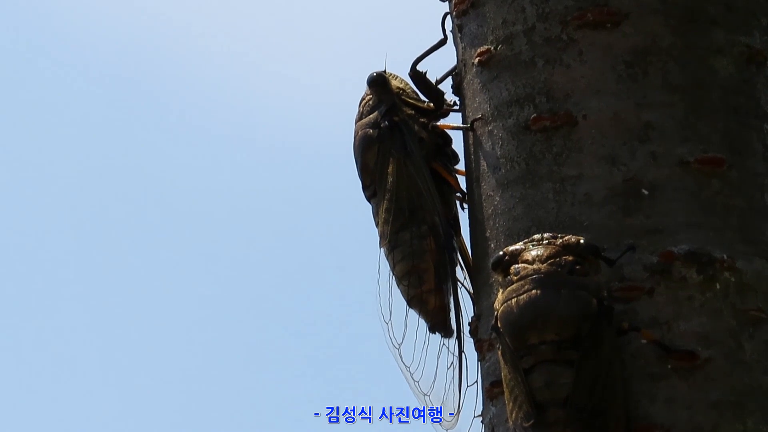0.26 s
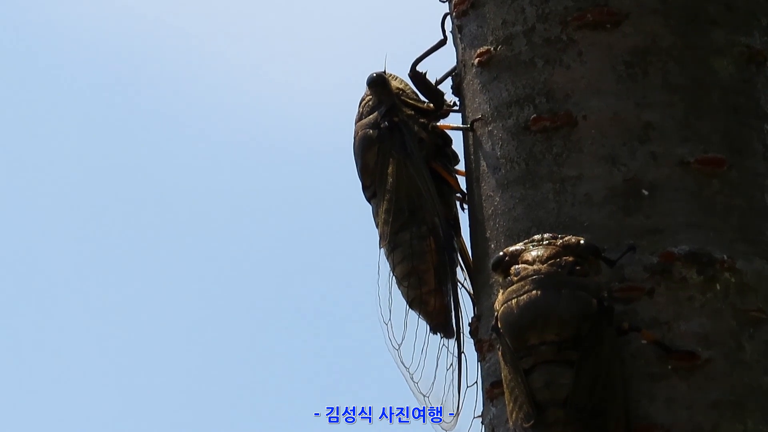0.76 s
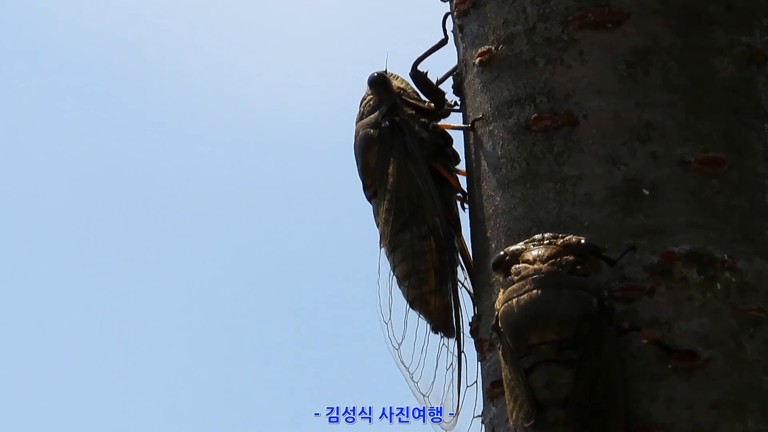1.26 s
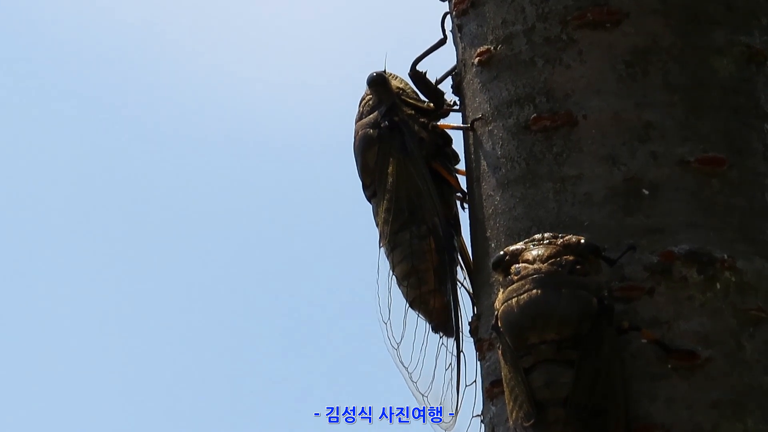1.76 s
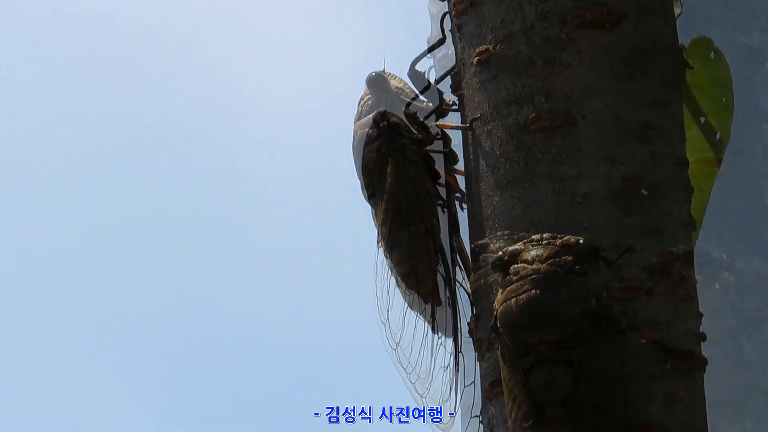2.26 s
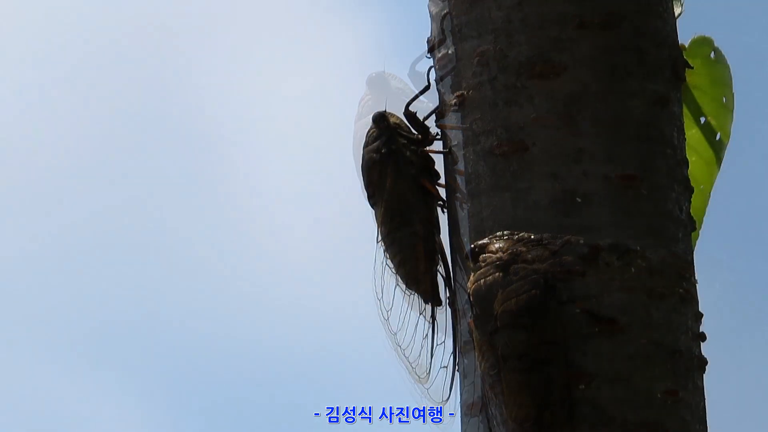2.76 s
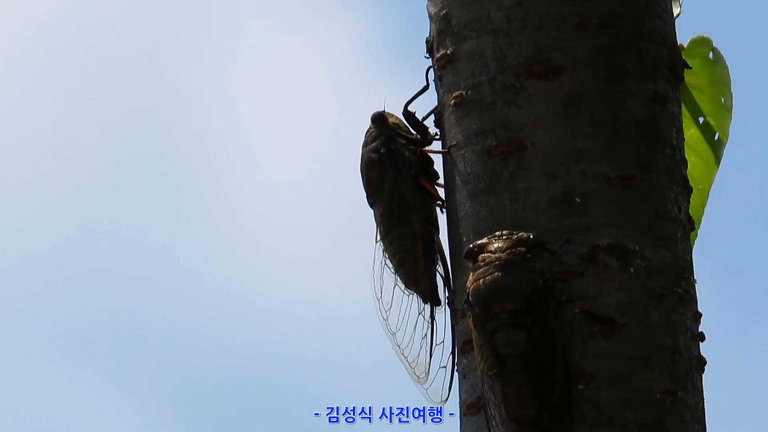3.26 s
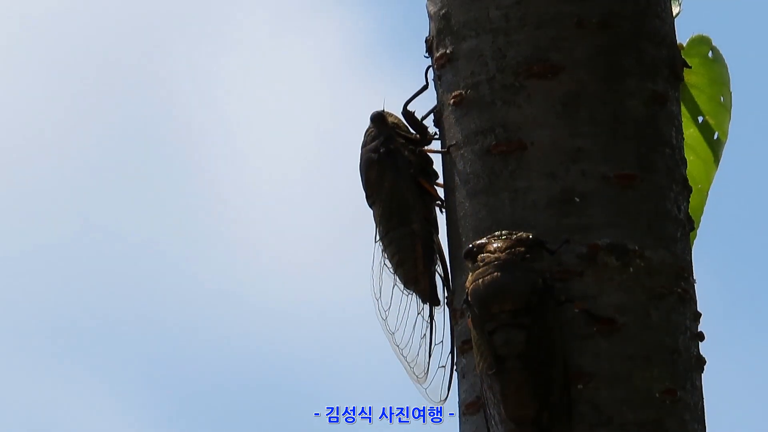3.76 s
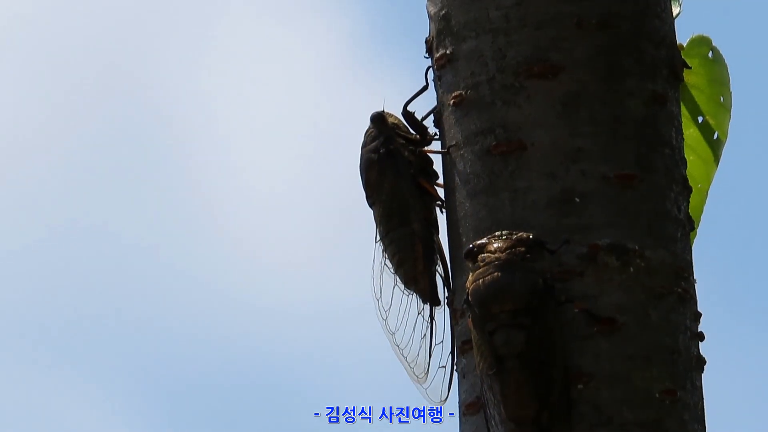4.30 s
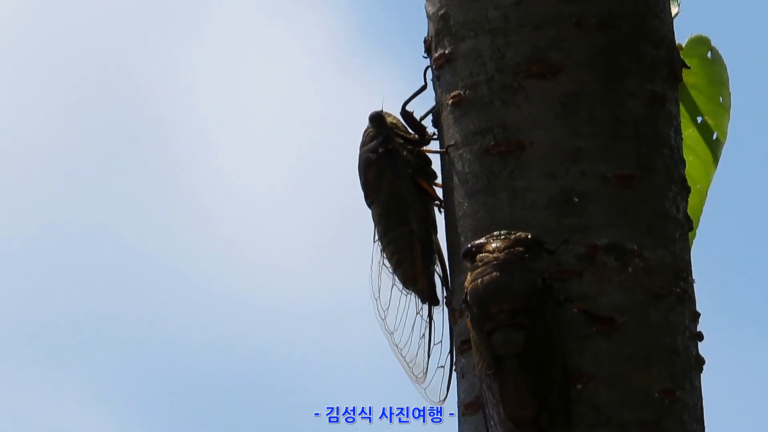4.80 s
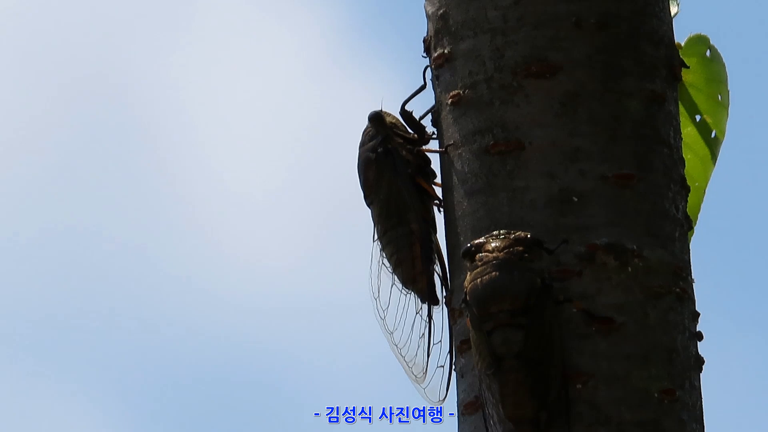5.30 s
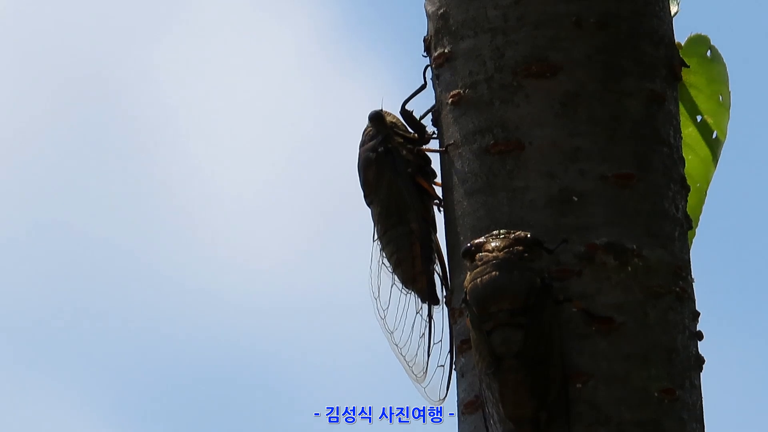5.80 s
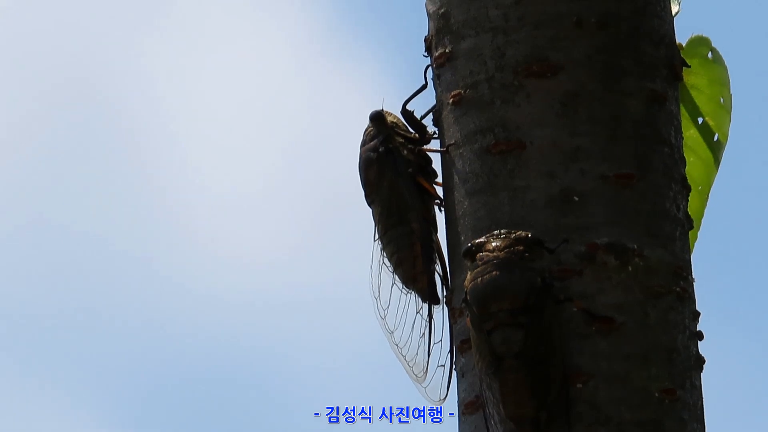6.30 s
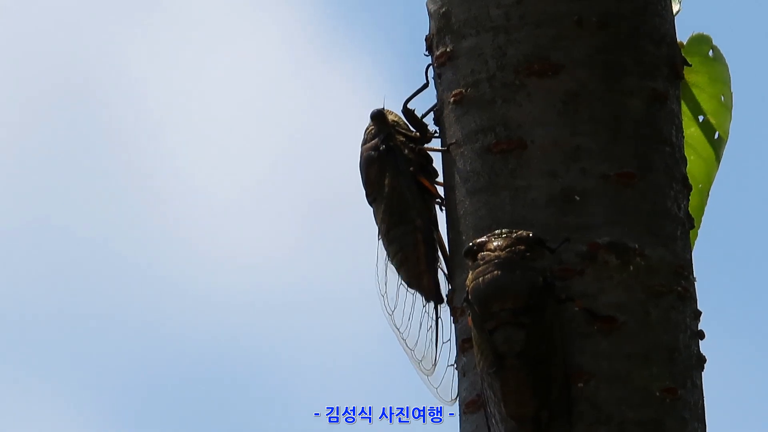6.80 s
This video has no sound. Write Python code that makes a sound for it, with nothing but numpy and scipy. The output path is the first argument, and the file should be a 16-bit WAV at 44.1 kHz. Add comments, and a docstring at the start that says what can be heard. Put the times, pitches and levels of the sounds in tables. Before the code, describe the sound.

From the start, a nearby cicada buzzes loudly on a tree trunk, a high, hissing, ringing rattle with a very fast pulse. It weakens slightly, falters and stops short at about 1.2 seconds. Behind it, a faint hiss of far cicadas and a low rumble of distant traffic continue throughout, briefly heard alone. From about 2 seconds another cicada swells up slowly, its tone opening a little between 3.3 and 3.9 seconds and peaking just after 4. Soft, brief rustles pass at around 3, 3.3, 4 and 5.2 seconds, mostly covered by the buzz. At 4 seconds a neighbouring cicada joins with a slightly slower pulse and a broader sizzle, taking the lead by about 5 seconds. Both keep buzzing loudly until the end at about 7 seconds. The space is open air among trees, with very little echo.

```python
"""A cicada buzzes on a trunk over a far chorus and town rumble. Each muscle stroke buckles the ribs of
its tymbals in a row of clicks that ring in the hollow belly. It tires, falters and stops short at 1.2 s.
From 2 s another swells up slowly and lifts its belly half open; a few soft rustles pass from 3 s.
At 4 s a neighbour joins with slower strokes and takes the lead."""
import sys
import numpy as np
from scipy import signal
from scipy.fft import rfft, irfft, next_fast_len
from scipy.io import wavfile
from scipy.ndimage import uniform_filter1d

SR = 44100
rng = np.random.default_rng(int(sys.argv[2]) if len(sys.argv) > 2 else 0)


def dump(signal):
    """Clip the signal to [-1, 1] and save it as 16-bit WAV at the path in sys.argv[1]."""
    limited = np.clip(np.atleast_2d(signal).T, -1, 1)
    pcm = np.round(limited * 32767).astype(np.int16)
    wavfile.write(sys.argv[1], SR, pcm)


N = 310905

# ending singer, direct click spectrum: f/Hz, gain/dB
ENDING_SPECTRUM = [(1060, -64), (1800, -27.5), (2930, -15.5), (3320, -6.5), (3630, -7.5), (3870, 1),
                   (4800, -3), (5160, -4.5), (6760, 1.5), (8460, -9.5), (11000, -9.5), (12700, -29),
                   (15500, -17)]
# ending singer, belly modes: f/Hz, width/Hz, gain/dB
ENDING_BELLY = [(3410, 25, -3), (3550, 50, -1), (3840, 46, 9), (3985, 41, 4), (4310, 74, -2), (4680, 44, 5),
                (4835, 41, 5), (5370, 42, 2), (5740, 86, 1), (5990, 47, 11), (6080, 40, 6.5), (6262, 25, 7),
                (6590, 110, 9), (6850, 47, 8), (7230, 65, 5), (7590, 27, -9), (7870, 65, -1), (8720, 28, 1),
                (8450, 51, -12), (9090, 88, -4), (10200, 150, -14), (10940, 43, 0), (10500, 43, -8),
                (11400, 47, -9), (11400, 42, -14), (11700, 170, -23)]
# far chorus, direct spectrum: f/Hz, gain/dB
CHORUS_SPECTRUM = [(1470, -23), (2500, -6.5), (3020, -8.5), (3530, 3.5), (4200, -2), (4710, 3),
                   (7480, -4.5), (8150, -9), (9980, -14), (12600, -26), (14000, -32)]
# far chorus, belly modes: f/Hz, width/Hz, gain/dB
CHORUS_BELLY = [(4670, 120, -2), (5970, 55, -1.5), (6900, 106, -6), (7400, 100, -13), (7900, 69, -6),
                (8470, 47, -8)]
# traffic spectrum: f/Hz, gain/dB
RUMBLE_SPECTRUM = [(12, -39), (20, -12), (38, -9), (59, 2), (82, -3.5), (235, -11.5), (277, -15),
                   (306, -14.5), (416, -19), (1020, -22.5), (2600, -41), (3380, -76), (5720, -120)]
# traffic envelope: t/s, level/dB, hum boost/dB, whirr boost/dB
TOWN_LEVELS = [(0.0, -36, -4.5, 1.5), (2.1, -37.5, -2.5, 2.1), (2.6, -39.5, 0.5, -1),
               (3.1, -35.5, 0.3, -1.1), (5.7, -39.5, -0.4, -2), (7.05, -41.5, -3, -8)]
# swelling singer, envelope: t/s, level/dB
SWELLING_LEVELS = [(1.95, -58), (2.25, -39), (2.5, -31), (2.97, -23.5), (4.3, -18.5), (4.9, -19),
                   (5.4, -23), (7.05, -22.5)]
# swelling singer, direct click spectrum: f/Hz, gain/dB
SWELLING_SPECTRUM = [(1060, -69), (1800, -32), (2770, -20.5), (3150, -12), (4670, -2), (5300, -13.5),
                     (6070, -2.5), (8090, -14.5), (10600, -16), (11700, -29), (12700, -39), (15500, -23)]
# swelling singer, closed belly modes: f/Hz, width/Hz, gain/dB
CLOSED_BELLY = [(3233, 54, -10), (3420, 47, -8), (3726, 56, -3), (4280, 42, 5), (4535, 28, 0),
                (4650, 27, -1), (4760, 35, -0.5), (5040, 50, 1.5), (5300, 30, -7), (5480, 91, -8),
                (5690, 47, -15), (5935, 50, 2.5), (6300, 39, -23), (6720, 56, -7), (7130, 150, -13.5),
                (8100, 100, -23), (8530, 130, -19), (9000, 350, -22.5), (9500, 99, -20), (10140, 81, -16),
                (10600, 55, -13), (11000, 120, -21), (11850, 91, -40)]
# swelling singer, half open belly modes: f/Hz, width/Hz, gain/dB
HALF_OPEN_BELLY = [(3220, 23, -22), (3534, 69, -12), (3850, 81, -5.5), (4320, 36, -4), (4672, 40, 0.5),
                   (4798, 55, 1), (5035, 38, 3.5), (5460, 33, -6), (5670, 43, -6.5), (5950, 52, 2),
                   (6710, 76, -4), (7110, 40, -3), (7900, 110, -20), (8740, 36, -20), (9050, 160, -14.5),
                   (9800, 120, -18), (10440, 60, -15.5), (10650, 21, -18), (10900, 57, -14.5),
                   (11240, 51, -20), (11800, 56, -26)]
# rustles: t/s, level/dB, decay/s, centre/Hz
RUSTLE_EVENTS = [(3.005, -46, 0.046, 1200), (3.312, -46, 0.028, 1200), (4.003, -35, 0.066, 860),
                 (5.245, -39, .045, 1820)]
# rustle spectrum: f/centre, gain/dB
RUSTLE_SPECTRUM = [(.2, -20), (.45, 0), (1, 1), (1.9, -2), (3.2, -32)]
# joining singer, envelope: t/s, level/dB
JOINING_LEVELS = [(4.0, -34), (4.6, -21.5), (5.15, -16), (6.25, -17), (6.8, -16), (7.05, -17.5)]
# joining singer, direct click spectrum: f/Hz, gain/dB
JOINING_SPECTRUM = [(1060, -82), (1800, -44), (2850, -22.5), (3470, -4), (4120, -5.5), (4720, -5),
                    (5350, -4), (7200, -3), (8460, -9.5), (11000, -13.5), (13200, -21.5), (15500, -31)]
# joining singer, open belly modes: f/Hz, width/Hz, gain/dB
OPEN_BELLY = [(4345, 31, 3.5), (4675, 103, 3.5), (5050, 54, 2.5), (5720, 40, 2), (5970, 47, -1),
              (7060, 140, -12), (7960, 35, -5.5), (9330, 140, -13), (10300, 51, -19), (10800, 100, -16)]
# stereo side spectrum: f/Hz, gain/dB
SIDE_SPECTRUM = [(60, -31), (92, -23), (140, -14), (210, -10.5), (330, -4), (500, -4), (770, -9.5),
                 (1170, -7.5), (1790, -8.5), (2740, -15), (4190, -33), (6410, -9), (9810, -10), (15000, -2)]

RIBS, HISS_DB = 12, 1.5
ENDING_DB, TIRE_DB_PER_S = -20, 3
FALTER_S, FALTER_DB_PER_S = 1.095, 65
STOP_S, STOP_DB_PER_S = 1.171, 900
CHORUS_DB, CHORUS_THROB_DB, CHORUS_THROB_HZ = -45, .97, 53.5
LIFT_START_S, LIFT_S = 3.32, .56
BARK_T60_S, BARK_DB = .09, -9
TREES_T60_S, TREES_DB = .25, -14
FULL_SCALE, CUTOFF_HZ = .95, 15600
TIME_S = np.arange(N) / SR


def amp(db):
    return 10 ** (np.asarray(db) / 20)


def unit_rms(x):
    return x / np.sqrt(np.mean(x ** 2) + 1e-20)


def curves(rows):
    times_s, *columns = np.transpose(rows)
    return [np.interp(TIME_S, times_s, column) for column in columns]


def envelope(levels):
    """Gain curve, silent before the first row."""
    return amp(curves(levels)[0]) * (TIME_S >= levels[0][0])


def colour(x, spectrum):
    """Filter, interpolated over log frequency."""
    size = next_fast_len(N)
    hz, db = np.transpose(spectrum)
    log_hz = np.log(np.arange(size // 2 + 1) * SR / size + 1)
    gain = amp(np.interp(log_hz, np.log(hz), db))
    return irfft(rfft(x, size) * gain, size)[..., :N]


def resonate(x, hz, width_hz):
    """Two-pole band-pass, peak gain 1."""
    r = np.exp(-np.pi * width_hz / SR)
    gain = (1 - r * r) / 2
    return signal.lfilter([gain, 0, -gain], [1, -2 * r * np.cos(2 * np.pi * hz / SR), r * r], x)


def tymbal(stroke_hz, drift_hz_per_s, throb_db, start_s):
    """Ribs buckle in turn, one click each per stroke. The rate drifts through stroke_hz at start_s."""
    rate_hz = np.maximum(stroke_hz + drift_hz_per_s * (TIME_S - start_s), 30)
    strokes = np.cumsum(rate_hz) / SR
    count = int(strokes[-1]) + 1
    # each rib's timing and strength wander over 16 strokes
    shift, strength = 4 * uniform_filter1d(rng.standard_normal((2, count, RIBS)), size=16, axis=1)
    jitter = rng.standard_normal((count, RIBS))
    place = np.arange(count)[:, None] + (np.arange(RIBS) + .2 * shift + .05 * jitter) / RIBS
    onsets = np.interp(place, strokes, np.arange(N)).astype(int)
    clicks = np.zeros(N)
    clicks[onsets] = amp(.4 * strength)
    bursts = signal.lfilter([1], [1, -.94], clicks)   # 0.4 ms decay
    throb = amp(throb_db * (np.cos(2 * np.pi * strokes) + .29 * np.cos(4 * np.pi * strokes)))
    noise = rng.choice([-1, 1], N)
    return throb * (unit_rms(bursts) + amp(HISS_DB)) * noise


def belly(clicks, spectrum, modes, direct_db):
    """Direct clicks plus the ringing of the hollow belly, at unit RMS."""
    ring = sum(amp(db) * resonate(clicks, hz, width_hz) for hz, width_hz, db in modes)
    ring = colour(ring, [(2000, -28), (3000, -.5), (12000, 2), (14000, -31)])
    return unit_rms(amp(direct_db) * colour(clicks, spectrum) + ring)


def ending_singer():
    """Tires with slowing strokes, falters, stops short."""
    clicks = tymbal(stroke_hz=48.8, drift_hz_per_s=-6.5, throb_db=2.2, start_s=0)
    level_db = ENDING_DB - TIRE_DB_PER_S * TIME_S
    level_db -= FALTER_DB_PER_S * np.maximum(TIME_S - FALTER_S, 0)
    level_db -= STOP_DB_PER_S * np.maximum(TIME_S - STOP_S, 0)
    return amp(level_db) * belly(clicks, ENDING_SPECTRUM, ENDING_BELLY, direct_db=4)


def echoes(x, t60_s):
    """Scatter from leaves and trunks: two independent, dense, decaying tails."""
    t = np.arange(SR // 2) / SR
    tails = rng.standard_normal((2, len(t))) * amp(-60 * t / t60_s)
    tails /= np.sqrt(np.sum(tails ** 2, axis=1, keepdims=True))
    return signal.fftconvolve(x[None], tails, axes=1)[:, :N]


def on_trunk(voice):
    """Quick returns from bark and near leaves comb each voice differently."""
    returns = amp(BARK_DB) * echoes(voice, BARK_T60_S)[0]
    return (voice + returns) / np.sqrt(1 + amp(2 * BARK_DB))


def chorus():
    """Many far singers blur into a hiss; the nearest still throbs."""
    throb = amp(CHORUS_THROB_DB * np.sin(2 * np.pi * CHORUS_THROB_HZ * TIME_S))
    hiss = throb * rng.standard_normal(N)
    return amp(CHORUS_DB) * belly(hiss, CHORUS_SPECTRUM, CHORUS_BELLY, direct_db=-3)


def town():
    """Far traffic, mid and side: a rumble whose hum and whirr come and go."""
    level_db, hum_db, whirr_db = curves(TOWN_LEVELS)
    rumble = unit_rms(colour(rng.standard_normal((2, N)), RUMBLE_SPECTRUM))
    hum = colour(rumble, [(120, -34), (300, -1.5), (500, -3), (900, -21)])
    whirr = colour(rumble, [(450, -23), (900, .5)])
    return amp(level_db) * (rumble + (amp(hum_db) - 1) * hum + (amp(whirr_db) - 1) * whirr)


def swelling_singer():
    """Grows louder and lifts its belly from closed to half open."""
    clicks = tymbal(stroke_hz=49.3, drift_hz_per_s=1.1, throb_db=1.87, start_s=SWELLING_LEVELS[0][0])
    closed = belly(clicks, SWELLING_SPECTRUM, CLOSED_BELLY, direct_db=0)
    half_open = belly(clicks, SWELLING_SPECTRUM, HALF_OPEN_BELLY, direct_db=-4.5)
    lift = np.clip((TIME_S - LIFT_START_S) / LIFT_S, 0, 1)
    return envelope(SWELLING_LEVELS) * ((1 - lift) * closed + lift * half_open)


def rustles():
    """Soft noise bursts: sudden onset, exponential decay."""
    noise = rng.standard_normal(N)
    out = np.zeros(N)
    for start_s, db, decay_s, centre_hz in RUSTLE_EVENTS:
        decay = (TIME_S > start_s) * np.exp(-np.abs(TIME_S - start_s) / decay_s)
        spectrum = [(ratio * centre_hz, gain_db) for ratio, gain_db in RUSTLE_SPECTRUM]
        out += amp(db) * decay * unit_rms(colour(noise, spectrum))
    return out


def joining_singer():
    """A neighbour with slower strokes and a broad, open sizzle."""
    clicks = tymbal(stroke_hz=45.6, drift_hz_per_s=.55, throb_db=1.5, start_s=JOINING_LEVELS[0][0])
    return envelope(JOINING_LEVELS) * belly(clicks, JOINING_SPECTRUM, OPEN_BELLY, direct_db=6)


def scene():
    """Singers, chorus and rustles among trees, over traffic; mid/side to left/right."""
    singers = sum(on_trunk(voice) for voice in [ending_singer(), swelling_singer(), joining_singer()])
    sources = singers + chorus() + rustles()
    trees_mid, trees_side = amp(TREES_DB) * echoes(sources, TREES_T60_S)
    leaves_side = echoes(sources, t60_s=.24)[0]   # nearest leaves reach left and right unevenly
    town_mid, town_side = town()
    mid = sources + trees_mid + town_mid
    side = colour(leaves_side + trees_side + town_side, SIDE_SPECTRUM)
    return np.array([mid + side, mid - side])


def record(dry):
    """Soft peak limit, then a steep low-pass."""
    rounded = dry / (1 + (dry / FULL_SCALE) ** 8) ** .125
    return signal.sosfilt(signal.cheby2(12, 70, CUTOFF_HZ, fs=SR, output="sos"), rounded)


dry = scene()
out = record(dry)
dump(out)
```